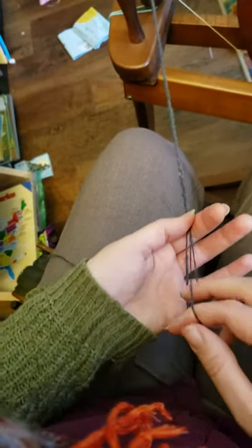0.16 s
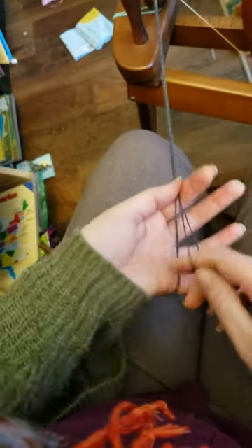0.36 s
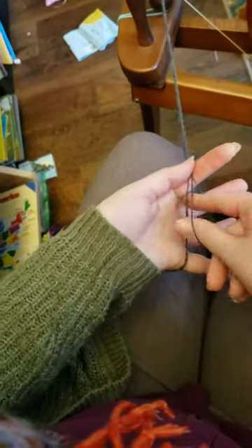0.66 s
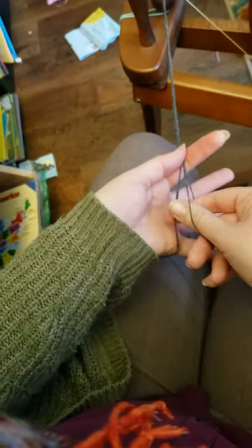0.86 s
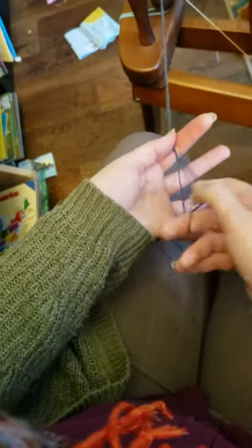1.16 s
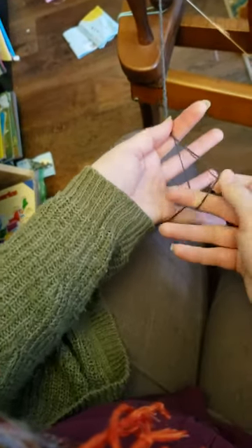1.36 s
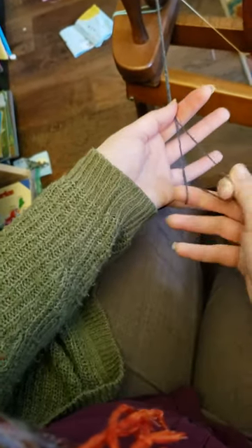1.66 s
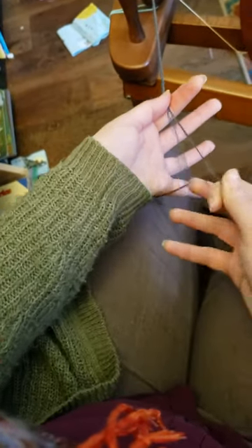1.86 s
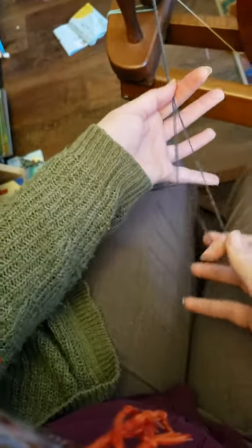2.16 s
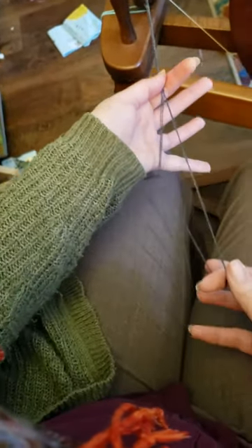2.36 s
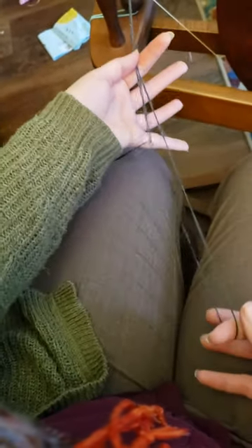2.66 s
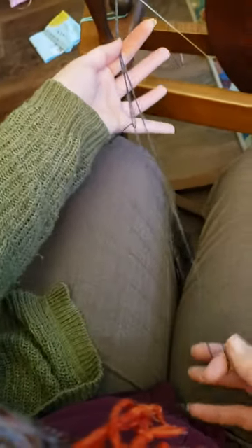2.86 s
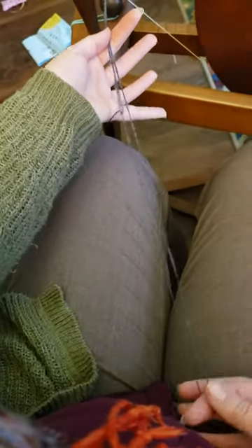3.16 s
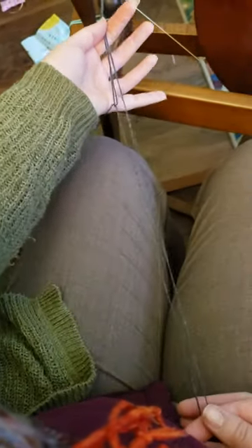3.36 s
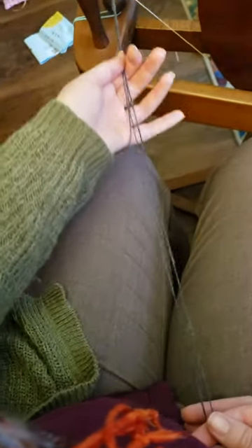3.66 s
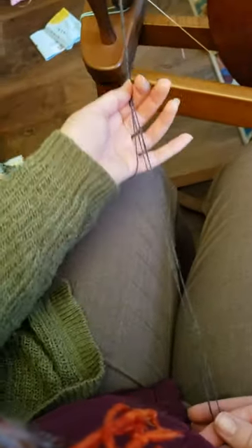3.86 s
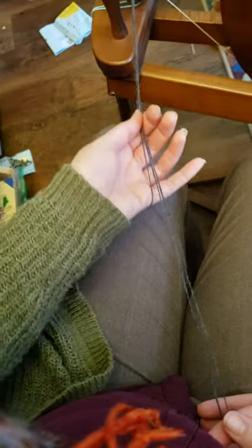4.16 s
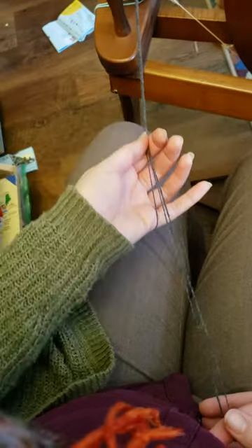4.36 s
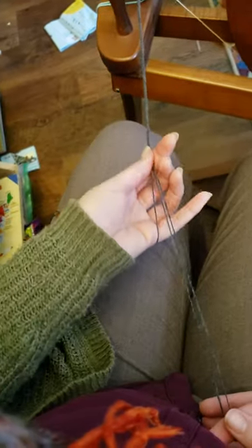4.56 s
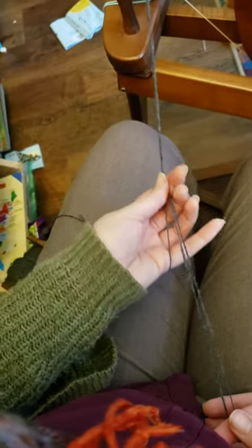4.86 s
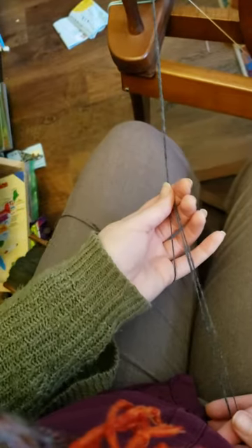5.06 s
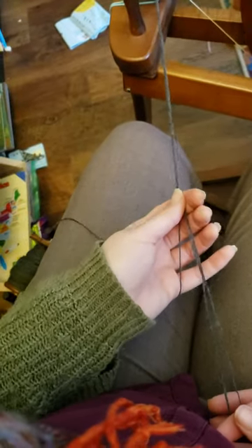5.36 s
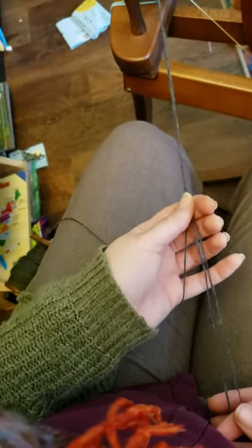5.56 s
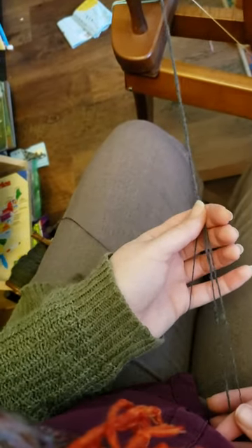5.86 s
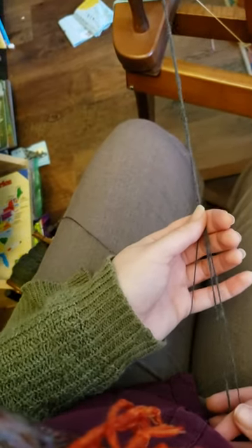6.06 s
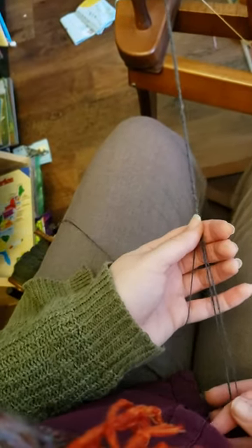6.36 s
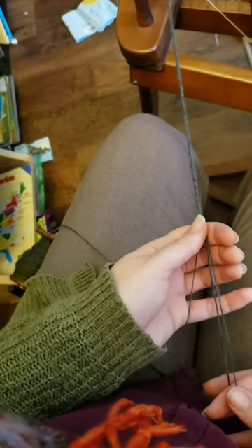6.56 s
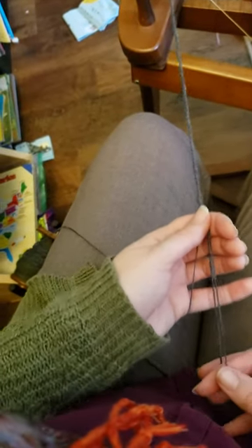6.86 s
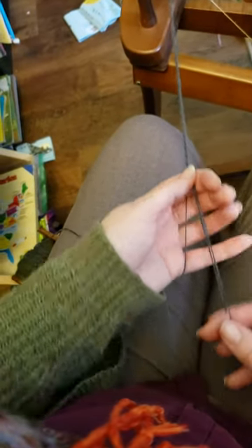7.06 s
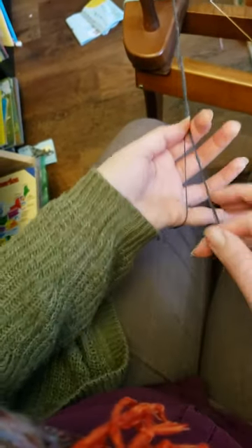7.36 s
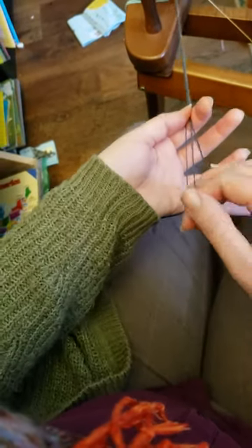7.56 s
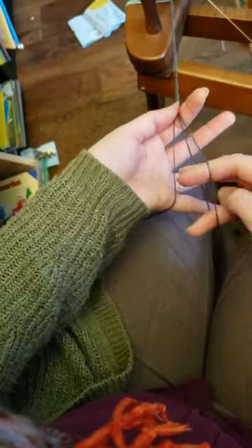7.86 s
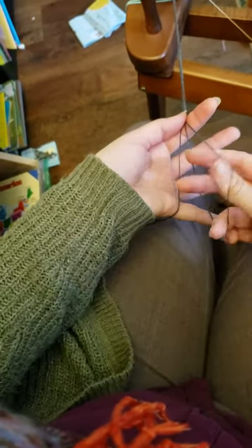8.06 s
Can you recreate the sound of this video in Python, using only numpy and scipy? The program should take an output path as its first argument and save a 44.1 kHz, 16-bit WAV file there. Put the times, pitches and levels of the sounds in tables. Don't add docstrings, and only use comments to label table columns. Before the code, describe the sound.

Close, quiet stereo pickup of an old wooden wheel worked by foot indoors. Dull, rounded knocks and deeper treadle thumps keep a slow, slightly uneven rhythm over wooden shuddering and a low floor rumble. Stirred air flutters lightly, with tiny narrow squeaks of yarn on hooks, short creaks, woolly sleeve brushes and small dry ticks. Light finger rattles come near seven seconds. The room tail is short, with faint hiss throughout.

```python
import sys
import numpy as np
from scipy import signal
from scipy.fft import rfft, irfft, next_fast_len
from scipy.io import wavfile
from scipy.ndimage import uniform_filter1d, map_coordinates

SR = 44100
rng = np.random.default_rng(int(sys.argv[2]) if len(sys.argv) > 2 else 0)


def store_wav(level_fs):
    pcm = np.round(np.clip(np.atleast_2d(level_fs), -1, 1) * 32767)
    wavfile.write(sys.argv[1], SR, pcm.T.astype(np.int16))


def amplitude_ratio(level_db):
    exponent = np.asarray(level_db, float) / 20
    return 10 ** exponent


N = 362708
TIME_S = np.arange(N) / SR


def unit(x):
    return x / np.sqrt(np.mean(x ** 2) + 1e-20)


def along(points, hz):
    f, v = np.transpose(points)
    return np.interp(np.log(hz + 1), np.log(f + 1), v)


def curves(rows):
    s, *cols = np.transpose(rows)
    return [np.interp(TIME_S, s, c, right=c[-1]) for c in cols]


def wobble(rate):
    return map_coordinates(rng.standard_normal(int(N * rate / SR) + 4), [np.arange(N) * rate / SR])


def filtered(x, response):
    n = x.shape[-1]
    m = next_fast_len(n + 8192)
    return irfft(rfft(x, m) * response(np.fft.rfftfreq(m, 1 / SR)), m)[..., :n]


def hump(f, hz, width):
    return 1 / (1 + (2 * (f - hz) / width) ** 2)


# Hz, likeness of the two ports 0-1.
PORT_LIKENESS = [(60, .92), (300, .93), (500, .88), (700, .65), (1000, .22), (2000, .15), (3300, .4),
                 (5000, .15), (12000, .1)]


def pair(z, hz):
    turn = np.arccos(along(PORT_LIKENESS, hz)) / 2
    mid = z[0] * np.cos(turn)
    side = z[1] * np.sin(turn)
    return np.array([mid + side, mid - side])


def noise(gain, n=N):
    m = next_fast_len(n)
    hz = np.fft.rfftfreq(m, 1 / SR)
    z = rng.standard_normal((2, len(hz))) + 1j * rng.standard_normal((2, len(hz)))
    return unit(irfft(pair(z, hz) * gain(hz), m)[:, :n])


def even(x):
    even_s = 0.04
    power = np.abs(uniform_filter1d(np.mean(x ** 2, axis=0), size=round(even_s * SR)))
    return unit(x / np.sqrt(power + 0.1))


def patchy(x, depth_db):
    z = signal.stft(x, nperseg=512)[2]
    field = uniform_filter1d(rng.standard_normal(z.shape[1:]), size=14, axis=0)
    field = uniform_filter1d(field, size=5, axis=1)
    return signal.istft(z * amplitude_ratio(depth_db * unit(field)), nperseg=512)[1][:, :N]


def swells(rows):
    t = np.arange(0, N, 64) / SR
    power = sum(amplitude_ratio(2 * db) * np.exp(-2 * ((t - s) / half) ** 2) for s, half, db in rows)
    return np.interp(TIME_S, t, power)


def wander(hz, rate):
    return 2 * np.pi * np.cumsum(hz * (1 + 0.017 * wobble(rate))) / SR


def scattered_tone(hz, t):
    spread_turns = 0.22
    return np.sin(2 * np.pi * (hz * t + rng.random() + rng.normal(0, spread_turns, (2, 1))))


def ring(modes, t, scatter_db, soft=1, hold_s=0):
    lag_s, swing = 0.002, 2.6
    t = np.clip(t - lag_s, 0, None)
    free = np.clip(t - hold_s, 0.28 * t, None)
    out = 0
    for hz, db, rise, t60 in modes:
        decay = amplitude_ratio(db + rng.normal(0, scatter_db) - 60 * free / t60)
        out = out + decay * (1 - np.exp(-(t / (soft * rise)) ** swing)) * np.sin(2 * np.pi * hz * t)
    return out


# Hz, level in dB, t60 in seconds.
SLAT_MODES = [(639, -1, 0.11), (699, -5, 0.085), (886, -4, 0.13), (1000, -24, 0.073), (1163, 1, 0.077),
              (1238, -2.5, 0.13), (1395, -0.5, 0.078), (1519, 5.5, 0.058), (1583, 2, 0.03),
              (1760, -12, 0.052), (1960, -24, 0.044)]


def slap(t, rough, spread):
    hold_s = 0.029
    free = np.clip(t - hold_s, 0.39 * t, None)
    modes = sum(amplitude_ratio(db + rng.normal(0, 1.7) - 60 * free / t60) * scattered_tone(hz, t)
                for hz, db, t60 in SLAT_MODES)
    rattle = noise(lambda f: hump(f, 444, spread) ** 2 * (f > 350), len(t))
    rattle_decay = amplitude_ratio(-60 * t / 0.29) + 0.83 * amplitude_ratio(-60 * t / 0.0066)
    return (1 - np.exp(-t / 0.0018)) * (modes + rough * rattle * rattle_decay)


# Hz, t60 in seconds.
ROOM_T60 = [(100, 0.11), (600, 0.29), (2000, 0.25), (8000, 0.31)]


def tail():
    hz, t, z = signal.stft(rng.standard_normal((2, SR // 4)), SR, nperseg=256)
    decay = amplitude_ratio(-60 * t / along(ROOM_T60, hz)[:, None])
    x = signal.istft(pair(z, hz[:, None]) * decay, SR, nperseg=256)[1]
    return np.pad(x, ((0, 0), (250, 0))) / np.linalg.norm(x[0])


def add(track, s, sound):
    track[:, round(s * SR):][:, :sound.shape[-1]] += sound


def heard(hits, wet_db):
    out = np.zeros((2, N + SR))
    tails = [tail() for _ in range(4)]
    for k, (s, sound) in enumerate(hits):
        add(out, s, sound)
        add(out, s, amplitude_ratio(wet_db) * signal.fftconvolve(sound[:1], tails[k % len(tails)], axes=1))
    return out[:, :N]


# middle in seconds, half length in seconds, board level in dB,
# frame over board in dB.
JUDDER_BUMPS = [(0.026, 0.49, -80.5, 15.5), (0.328, 0.048, -60, -3.5), (0.527, 0.057, -59.5, -5),
                (0.887, 0.16, -65.5, 7), (1.118, 0.046, -58, -5), (1.43, 0.12, -66, 3),
                (1.698, 0.036, -67, -31), (1.879, 0.11, -75, 8), (2.363, 0.093, -51.5, -4.5),
                (2.461, 0.054, -60.5, -1), (2.669, 0.11, -55.5, -5.5), (2.883, 0.091, -54, -2.5),
                (3.027, 0.042, -53.5, -6), (3.285, 0.16, -64, -2.5), (3.55, 0.059, -66, 3),
                (3.78, 0.061, -60, 2), (3.892, 0.079, -56.5, -3), (4.285, 0.087, -63.5, 3.5),
                (4.6, 0.08, -68, -4), (4.805, 0.12, -74, 5), (5.056, 0.027, -72.5, 10.5),
                (5.62, .1, -90, -14), (5.852, 0.46, -77, -8), (6.305, 0.11, -59, -5.5),
                (6.788, 0.07, -73, 13.5), (7.055, 0.11, -68, 1), (7.296, 0.11, -63.5, 4),
                (7.506, 0.052, -68, 13.5), (7.796, 0.15, -75, -9), (8.122, 0.054, -63.5, 3)]


def judders(tilt):
    return swells([(s, half, db + tilt * excess_db) for s, half, db, excess_db in JUDDER_BUMPS])


# Hz, level in dB per Hz.
JOIST_COLOUR = [(20, -29.5), (35, -15.5), (55, 3), (90, -8), (130, -10.5), (200, -24), (400, -43),
                (900, -70), (2000, -120)]
# time in seconds, share of joist motion at its own pitch 0-1.
JOIST_STEADY = [(0, 0.06), (1.2, 0.25), (2.5, 0.06), (2.8, 0.6), (3.2, .1), (3.9, 0.72), (4.5, 0.03),
                (5.3, 0.67), (6, .4), (6.5, 0.74), (7.3, 0.53), (8.22, 0.84)]
# time in seconds, level in dB.
JOIST_LOAD = [(0.0, -58), (0.34, -60), (1.65, -62), (2.5, -58), (3.02, -60), (3.55, -59.5), (3.95, -53.5),
              (4.48, -65), (5.63, -57.5), (5.84, -67), (6.02, -59.5), (6.3, -59.5), (6.59, -53.5),
              (6.82, -56), (7.53, -55), (7.84, -59), (8.1, -50), (8.22, -56)]
# middle in seconds, half length in seconds, level in dB.
FOOT_HEAVES = [(.0, 0.026, -48), (.33, .05, -60), (.53, .05, -59), (.89, 0.04, -57), (1.14, 0.04, -56.5),
               (1.36, .04, -58), (1.47, 0.04, -56), (1.68, .03, -56.5), (1.77, .03, -57.5),
               (1.98, 0.033, -53.5), (2.1, .03, -60), (2.5, 0.056, -58), (2.72, 0.062, -57),
               (2.86, 0.06, -54.5), (3.05, .04, -58), (3.22, 0.018, -49), (3.5, .06, -60),
               (3.8, 0.046, -55), (4.13, 0.046, -58), (4.28, 0.05, -53), (4.55, .05, -60), (4.67, .03, -61),
               (4.77, 0.04, -58), (4.91, 0.033, -56), (5.22, 0.036, -56.5), (5.4, 0.043, -59.5),
               (5.55, .03, -50.5), (5.72, 0.071, -56.5), (6.1, .05, -60), (6.42, 0.066, -56),
               (7.24, 0.068, -54), (7.72, 0.058, -56), (7.92, 0.047, -52.5)]


def wheel(sway):
    settle_db_per_s = -1.53
    load_db, = curves(JOIST_LOAD)
    steady = np.clip(curves(JOIST_STEADY)[0], 0, 1)

    def level(idle_db, power):
        return np.sqrt(amplitude_ratio(2 * (idle_db + settle_db_per_s * TIME_S)) + power)

    rumble = even(noise(lambda f: amplitude_ratio(along(JOIST_COLOUR, f))))
    rumble = unit(filtered(rumble, lambda f: hump(f, 40, 260)))
    joist = np.sqrt(steady) * np.sqrt(2) * np.sin(sway) + np.sqrt(1 - steady) * rumble
    joist = amplitude_ratio(4.5 + 0.6 * wobble(7)) * np.sqrt(amplitude_ratio(2 * load_db) + swells(FOOT_HEAVES)) * joist

    board = 1.53 * np.sin(2 * sway + 0.78) + 0.57 * even(noise(lambda f: hump(f, 139.0, 40)))
    board = amplitude_ratio(5.5) * level(-81, judders(0)) * board

    frame = even(noise(lambda f: hump(f, 243.3, 60) + 0.32 * hump(f, 326, 130) + 0.5 * hump(f, 185, 36)))
    frame = amplitude_ratio(1.4 * wobble(30) + 4.2 * np.cos(sway)) * level(-69.5, judders(0.82)) * frame

    bearing = noise(lambda f: hump(f, 515, 180) + 2.36 * hump(f, 472, 79) + 0.77 * hump(f, 787, 360))
    bearing_db = -10 - 1.76 * TIME_S
    bearing = level(-80.5, amplitude_ratio(2 * bearing_db) * judders(1.12)) * bearing
    return amplitude_ratio(1.3 * wobble(12)) * (joist + board + frame + bearing)


# time in seconds, level in dB.
FLYER_EFFORT = [(0.0, -76), (0.25, -75), (0.87, -78.5), (1.39, -75), (1.62, -75.5), (2.45, -76),
                (2.65, -75.5), (2.98, -76.5), (3.14, -75), (3.69, -77), (4.4, -73.5), (4.71, -76),
                (5.7, -74.5), (6.32, -76.5), (6.62, -73.5), (6.87, -74), (7.37, -77), (8.22, -75)]
# Hz, level in dB per Hz.
AIR_COLOUR = [(250, -120), (400, 2.5), (600, -2), (1000, 1), (2000, 3.5), (4000, 1.5), (6000, -3),
              (9000, -0.5), (15000, -1.5)]
# time in seconds, level in dB.
ORIFICE_PUFFS = [(.32, -83), (.63, -83), (.93, -82), (1.25, -85), (1.44, -83), (1.62, -83), (1.83, -78),
                 (2.1, -86), (2.27, -84), (2.4, -78), (2.65, -85), (2.83, -84), (3.05, -85), (3.5, -83),
                 (3.68, -80), (3.94, -80), (4.29, -81), (4.59, -82), (4.77, -84), (5.1, -87), (5.41, -81),
                 (5.57, -83), (5.73, -84), (5.89, -79.5), (6.3, -87), (6.7, -86), (7.03, -86), (7.31, -84),
                 (7.8, -85), (8.2, -83)]


def flyer():
    puff_half_s = 0.036
    air_db, = curves(FLYER_EFFORT)
    hook_db = -91 + 1.6 * (air_db - air_db.mean())
    air = patchy(noise(lambda f: amplitude_ratio(along(AIR_COLOUR, f))), depth_db=1.92)
    air = amplitude_ratio(air_db + 1.0 + 0.48 * wobble(22)) * air
    hooks = noise(lambda f: 0.63 * hump(f, 2558, 110) + 0.88 * hump(f, 2825, 67) + 0.24 * hump(f, 3730, 210))
    hooks = amplitude_ratio(hook_db + 3 * wobble(18) + [[0], [-5]]) * hooks
    drone = amplitude_ratio(-88) * noise(lambda f: hump(f, 596, 11) + 1.1 * hump(f, 496, 17))
    puffs = swells([(s, puff_half_s, db) for s, db in ORIFICE_PUFFS])
    whisper = np.sqrt(puffs) * noise(lambda f: hump(f, 13900, 2100))
    return air + whisper + hooks + drone


# time in seconds, upper band in Hz, pull in dB.
YARN_PULL = [(0, 1780, -71), (.1, 1790, -75), (.35, 1854, -74), (.64, 1932, -75.5), (.97, 2040, -75.5),
             (1.5, 2152, -81.5), (2.1, 2090, -79), (2.3, 1787, -80), (2.86, 1830, -88), (3.1, 1800, -100)]


def yarn():
    upper_hz, upper_db = curves(YARN_PULL)
    lower_db = upper_db - 6 + 4 * TIME_S
    fade = amplitude_ratio(-40 * np.clip((TIME_S - 2.9) / 0.63, 0, 1))
    slow = unit(filtered(rng.standard_normal((2, N)), lambda f: hump(f, 0, 430)))
    turn = 2 * np.pi * np.cumsum(upper_hz) / SR
    upper = slow * np.sin(turn) + slow[::-1, ::-1] * np.cos(turn)
    lower = noise(lambda f: hump(f, 1060, 400) + 0.25 * hump(f, 1630, 550))
    return fade * amplitude_ratio(1.3 * wobble(9.53)) * (amplitude_ratio(upper_db - 0.5) * upper + amplitude_ratio(lower_db) * lower)


# start in seconds, peak in dB, slap in dB, softness of the contact.
ROD_KNOCKS = [(0.002, -52.5, -23, 0.31), (0.498, -46, -45, 2), (.525, -49.5, -40, 1.6),
              (1.385, -60, -40, 1.63), (1.446, -39.5, -25, 2.2), (2.573, -51.5, -14, 1.8),
              (2.851, -42.5, -15.5, 2.3), (2.917, -52, -28, 0.76), (3.195, -57, -20, 1.5),
              (4.257, -38.5, -24, 1.95), (5.53, -40.5, -26, 2), (6.755, -41.5, -30, 1.8),
              (5.77, -60, -40, 1.8), (6.37, -55.5, -34, 1.5), (8.078, -44.5, -25, 1.74)]
# Hz, level in dB, rise in seconds, t60 in seconds.
ROD_MODES = [(126, 3, 0.0058, 0.068), (183.5, -13.5, 0.012, 0.25), (246.7, -1.5, 0.0056, 0.083),
             (273.3, 3.5, 0.0077, 0.094), (337, -3, 0.0091, 0.053), (421.6, -26, 0.0036, 0.2),
             (487, -17.5, 0.0039, 0.059)]
# start in seconds, peak in dB, tap in dB.
ROD_TOUCHES = [
    (4.18, -50.5, -4),
    (5.456, -52.5, -7.5),
    (6.702, -55, -9),
    (7.064, -46, -15),
    (8.02, -57.5, -17),
]


def footman():
    t = np.arange(SR // 4) / SR
    hits = []
    for s, db, slap_db, soft in ROD_KNOCKS:
        body = noise(lambda f: hump(f, 238, 300), len(t))
        body = body * (1 - np.exp(-(t / (soft * 0.0073)) ** 2)) * amplitude_ratio(-60 * t / 0.14)
        rod = ring(ROD_MODES, t, scatter_db=1.5, soft=soft) + 0.25 * body
        hits.append((s, amplitude_ratio(db + 5.0) * rod + amplitude_ratio(db + slap_db - 16.5) * slap(t, rough=2.8, spread=850)))
    upper = [(hz * 1.065, db, rise, t60) for hz, db, rise, t60 in ROD_MODES if hz > 260]
    for s, db, tap_db in ROD_TOUCHES:
        tap = amplitude_ratio(db + tap_db - 60 * t / 0.15) * noise(lambda f: hump(f, 350, 480), len(t))
        hits.append((s, amplitude_ratio(db + 3.5) * ring(upper, t, scatter_db=1.2, soft=0.95) + tap))
    return heard(hits, wet_db=-4.0)


# middle in seconds, half length in seconds, level in dB.
HOOK_SQUEAKS = [(.1, 0.05, -81), (.47, 0.033, -86), (.63, .03, -89), (1.255, 0.051, -79),
                (1.46, 0.069, -79), (1.63, 0.05, -79), (1.765, .03, -82), (2.41, 0.037, -84),
                (2.63, 0.033, -83), (3.3, .08, -86.5), (4.115, 0.059, -76), (4.3, 0.04, -78.5),
                (4.45, 0.043, -76), (4.59, 0.058, -80), (4.77, .025, -83), (4.84, 0.027, -87),
                (5.02, 0.027, -91), (5.25, .045, -82), (5.41, 0.054, -79), (5.58, 0.045, -82),
                (5.945, 0.018, -86), (6.33, 0.043, -82.5), (6.535, 0.028, -83), (6.7, .04, -84),
                (6.845, 0.05, -78), (7.82, 0.04, -83), (8.03, .05, -83)]
# middle in seconds, half length in seconds, level in dB.
JOINT_SCRAPES = [
    (.91, 0.059, -63),
    (3.81, 0.043, -75),
    (3.9, 0.034, -69),
]
# middle in seconds, half length in
# seconds, level in dB, # bright part in dB.
RUBS = [
    (7.078, 0.073, -70.5, 7.5),
    (7.225, 0.031, -75, 6),
    (7.3, 0.034, -72, 0),
    (4.74, 0.16, -81.5, -3),
    (1.6, 0.037, -75, -9),
]


def rubbing(sway):
    squeak_hz = 2568
    tone = np.sqrt(2) * np.sin(2 * np.pi * np.cumsum(squeak_hz + 14 * wobble(40)) / SR)
    breath = noise(lambda f: hump(f, squeak_hz, 83) + 0.41 * hump(f, 3410, 90))
    squeak = np.sqrt(swells(HOOK_SQUEAKS)) * amplitude_ratio([[0], [-5]]) * (0.35 * tone + 0.9 * breath)

    slips = amplitude_ratio(5.5 * np.cos(sway))
    scrape = noise(lambda f: hump(f, 550, 100) + 0.15 * hump(f, 650, 160))
    scrape = slips * np.sqrt(swells(JOINT_SCRAPES)) * scrape

    dull = noise(lambda f: hump(f, 740, 200) + 1.9 * hump(f, 940, 90)
                 + 1.0 * hump(f, 1150, 90) + 0.5 * hump(f, 1620, 200))
    bright = noise(lambda f: hump(f, 2750, 150) + 0.38 * hump(f, 3530, 230) + 0.69 * hump(f, 2340, 270))
    dull = np.sqrt(swells([row[:3] for row in RUBS])) * dull
    bright_rows = [(s, half, db + over_db - 7.0) for s, half, db, over_db in RUBS]
    bright = np.sqrt(swells(bright_rows)) * bright
    return squeak + scrape + amplitude_ratio(1.1 * wobble(60)) * (dull + bright)


# start in seconds, peak in dB, pitch in Hz.
JOINT_CREAKS = [(0.138, -59, 543), (0.839, -64, 570), (.871, -56, 590), (.891, -55, 579), (0.914, -56, 576),
                (.933, -57, 606), (1.296, -58, 560), (1.832, -62, 538), (2.299, -65, 447),
                (3.266, -74, 505), (3.789, -56, 587), (3.823, -57, 509), (3.853, -59, 530),
                (3.905, -57.5, 587), (6.299, -59.5, 523)]


def creaks():
    t = np.arange(SR // 4) / SR
    swell = (1 - np.exp(-t / 0.0008)) * amplitude_ratio(-60 * t / 0.065)
    hits = []
    for s, db, hz in JOINT_CREAKS:
        groan = noise(lambda f: hump(f, hz, 160), len(t))
        hits.append((s, amplitude_ratio(db - 5.5) * swell * (1.07 * np.sin(2 * np.pi * hz * t) + 0.55 * groan)))
    return heard(hits, wet_db=-2.5)


# start in seconds, peak in dB, ring in Hz, dull puff in dB, dry puff in dB.
SMALL_TICKS = [
    (0.3004, -57.5, 1270, 3, 1),
    (1.8294, -56.5, 1080, -4.5, -9),
    (2.7632, -48, 3680, -4, -2.5),
    (2.9352, -43.5, 3590, -7.5, -7.5),
    (7.0102, -61, 3500, 4.5, 5),
    (7.285, -54, 1650, -0.5, -22),
    (7.51, -54, 1240, -17, -19),
]


def ticks():
    t = np.arange(SR // 5) / SR

    def puff(hz, width, t60):
        return noise(lambda f: hump(f, hz, width), len(t)) * amplitude_ratio(-60 * t / t60)

    swell = 3.17 * (1 - np.exp(-(t / 0.0019) ** 2)) * amplitude_ratio(-60 * t / 0.015)
    hits = []
    for s, db, hz, dull_db, dry_db in SMALL_TICKS:
        tone = np.sin(2 * np.pi * hz * t) * swell
        crack = 0.16 * puff(4700, 3100, 0.03) + 0.045 * puff(4400, 2200, 0.18)
        dry_puff = amplitude_ratio(dry_db - 12.0) * (puff(2450, 3300, 0.61) + 1.07 * puff(2850, 160, 0.21))
        dull_puff = amplitude_ratio(dull_db - 2.0) * puff(460, 2070, 0.22)
        hits.append((s, amplitude_ratio(db - 2) * (tone + crack + dry_puff + dull_puff)))
    return heard(hits, wet_db=-8.5)


# middle in seconds, level in dB, half length in seconds.
SLEEVE_BRUSHES = [
    (0.314, -85, 0.018),
    (0.849, -68, 0.0077),
    (0.872, -59.5, 0.009),
    (1.64, -71, 0.018),
    (1.836, -82, 0.016),
    (2.235, -70, 0.015),
    (3.655, -71.5, 0.051),
    (4.27, -71, 0.021),
    (4.57, -70.5, 0.045),
    (7.985, -75, .02),
]


def sleeve():
    strokes = sum(amplitude_ratio(db) * np.exp(-((TIME_S - s) / half) ** 2) for s, db, half in SLEEVE_BRUSHES)
    return amplitude_ratio([[-3], [3]]) * strokes * noise(lambda f: hump(f, 15600, 12000) + 0.5 * hump(f, 5200, 1800))


# start in seconds, slap peak in dB, body in dB, floor in dB, sharpness in dB per octave.
TREADLE_THUMPS = [
    (0.717, -49, -31, -3, 1),
    (2.214, -50, -30.5, -2.5, 0.5),
    (3.623, -49, -28.5, -9, 0),
    (4.941, -53, -32.5, 4.5, 0.8),
    (6.186, -51, -30, -4, 0),
    (7.424, -49.5, -29, -10, 0.7),
]
# Hz, level in dB, rise in seconds, t60 in seconds.
FLOOR_MODES = [(59.9, 2, 0.019, 0.16), (80.2, -8.5, 0.0065, 0.16)]
# Hz, level in dB, rise in seconds, t60 in seconds.
FRAME_MODES = [(107.7, -8, 0.026, 0.093), (125.7, 0, 0.024, 0.064), (137.4, 1.5, 0.0058, 0.1),
               (180, -5, 0.0045, 0.06), (233.8, -3.5, 0.02, 0.062), (303, -2.5, 0.02, 0.041),
               (348, -11.5, 0.005, 0.18), (383.6, -18, 0.0067, 0.045), (490.7, -25, 0.0035, 0.13)]


def treadle():
    t = np.arange(SR // 3) / SR
    hits = []
    for s, db, body_db, floor_db, tilt_db in TREADLE_THUMPS:
        modes = [(hz, level + tilt_db * np.log2(hz / 180), rise, t60) for hz, level, rise, t60 in FRAME_MODES]
        frame = amplitude_ratio(body_db - 0.5) * ring(modes, t, scatter_db=0.7, hold_s=0.022)
        floor = amplitude_ratio(db + floor_db + 22.0) * ring(FLOOR_MODES, t, scatter_db=0.0)
        clack = amplitude_ratio(-13.5 + 3 * tilt_db - 60 * t / 0.2) * noise(lambda f: hump(f, 2100, 800), len(t))
        contact = amplitude_ratio(db - 11.0) * (slap(t, rough=1.68, spread=2630) + clack)
        hits.append((s - 0.001, contact - frame - floor))
    return heard(hits, wet_db=-11)


# Hz, level in dB, t60 in seconds.
GUIDE_MODES = [(578, -3, 0.082), (680, 1, 0.075), (976, -10, .09), (1144, -2, 0.095), (1650, -7, .07),
               (2230, -13, 0.12), (2775, -10.5, 0.09), (3500, -16, .05)]
# start in seconds, level in dB, brightness in dB per octave.
FINGER_TAPS = [(7.01, -65, 4), (7.03, -62, 1), (7.067, -62.5, 5), (7.105, -74, 11), (7.208, -72, -2),
               (7.255, -67, -2), (7.269, -62, -3), (7.283, -58, -4.5), (7.293, -62, 0), (7.3, -60, -4),
               (7.33, -68, -1), (7.511, -72, -2)]


def guide():
    t = np.arange(SR // 6) / SR
    hits = []
    for s, db, tilt_db in FINGER_TAPS:
        modes = 0
        for hz, level, t60 in GUIDE_MODES:
            mode_db = db + level + tilt_db * np.log2(hz / 1000) + rng.normal(0, 2.6)
            modes = modes + amplitude_ratio(mode_db - 60 * t / t60) * scattered_tone(hz, t)
        hits.append((s, (1 - np.exp(-t / 0.0024)) * modes))
    return heard(hits, wet_db=-11.0)


def scene():
    sway = wander(71.8, rate=12)
    turning = wheel(sway) + flyer() + yarn()
    contacts = footman() + rubbing(sway) + creaks() + ticks() + sleeve() + treadle() + guide()
    return turning + contacts


def top_cut(x):
    return signal.sosfilt(signal.butter(12, 15730, fs=SR, output="sos"), x)


# Hz, width in Hz, level in dB.
LEFT_RESONANCES = [(2610, 290, 3), (3440, 96, 5), (6230, 380, 7), (7303, 724, 23), (10714, 690, 17.5),
                   (14200, 800, 6.5)]
# Hz, level in dB.
RIGHT_COLOUR = [(300, 0), (650, 4), (1200, -0.5), (2500, -4.5), (4500, -6.5), (7500, -69), (9500, -3),
                (12000, -17.5), (15000, -4)]
# Hz, level in dB per Hz.
HISS_COLOUR = [(300, 1), (2000, -11.5), (5000, 3.5), (7500, -50), (9500, -10), (11500, 5.5), (15000, 2.5)]


def record(dry):
    def ports_response(f):
        left = np.sqrt(1 + sum((amplitude_ratio(db) * hump(f, hz, width)) ** 2 for hz, width, db in LEFT_RESONANCES))
        lag_s = 12.5 / SR * f ** 4 / (f ** 4 + 600. ** 4)
        right = amplitude_ratio(along(RIGHT_COLOUR, f)) * np.exp(-2j * np.pi * f * lag_s)
        low_cut = f ** 2 / (f ** 2 + 24 ** 2)
        return np.array([left, right]) * low_cut

    ports = filtered(dry, ports_response)
    hiss = filtered(rng.standard_normal(dry.shape), lambda f: amplitude_ratio(along(HISS_COLOUR, f)))
    mix = filtered(ports + amplitude_ratio(-80) * unit(hiss), lambda f: f < 15730)
    return top_cut(mix)


dry = scene()
out = record(dry)
store_wav(out)
```